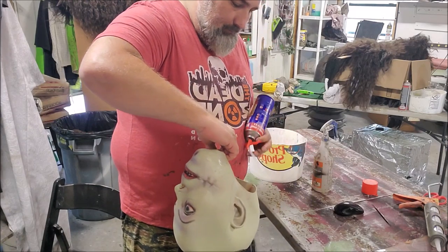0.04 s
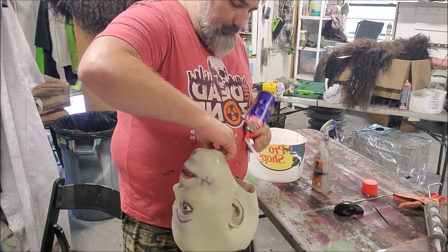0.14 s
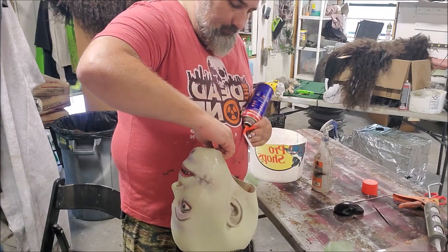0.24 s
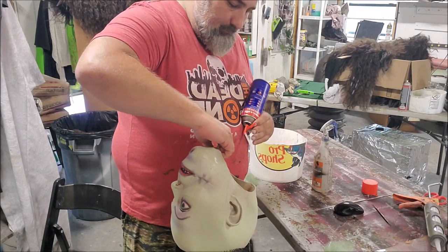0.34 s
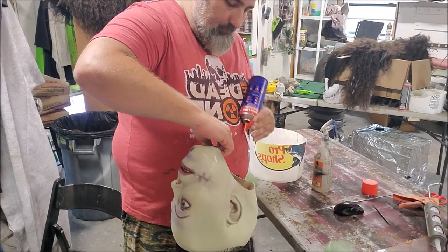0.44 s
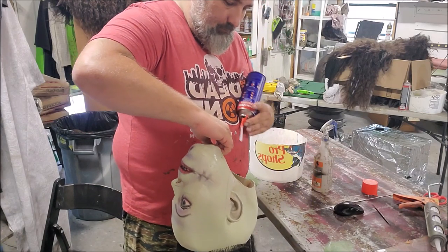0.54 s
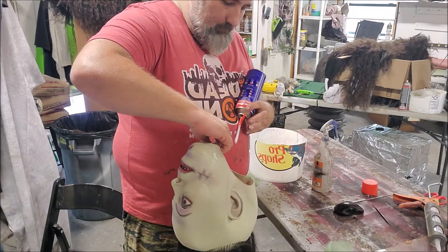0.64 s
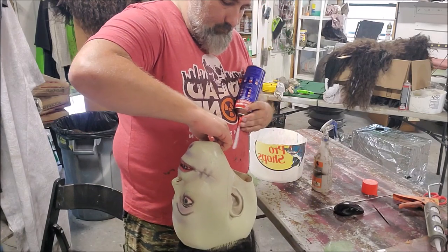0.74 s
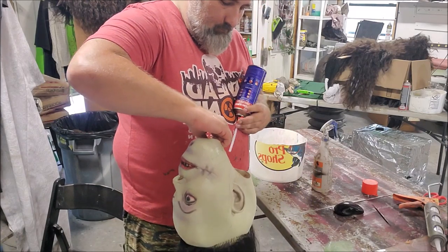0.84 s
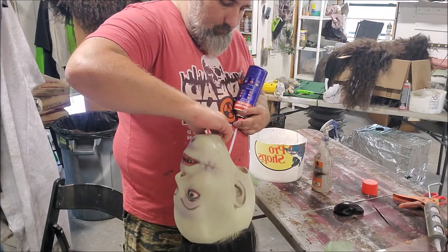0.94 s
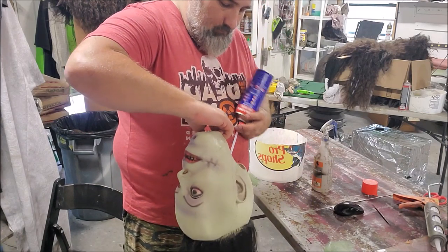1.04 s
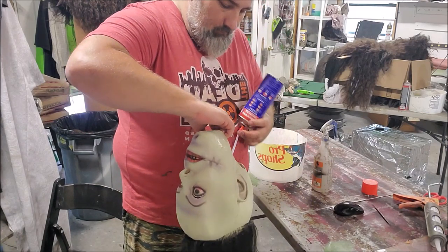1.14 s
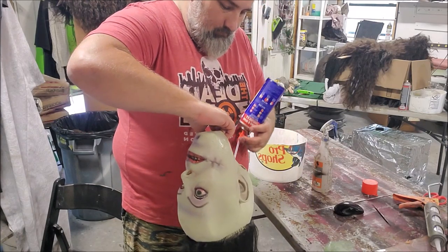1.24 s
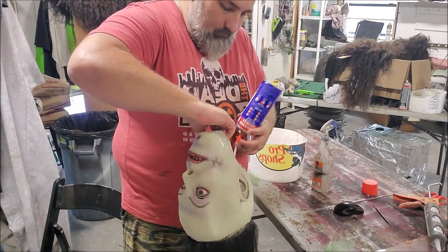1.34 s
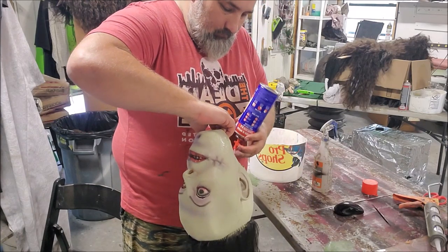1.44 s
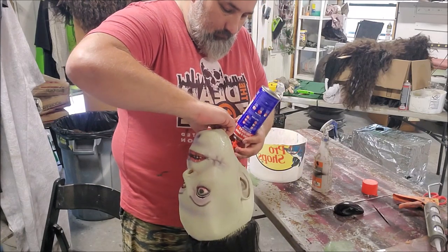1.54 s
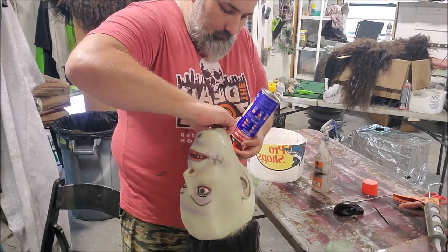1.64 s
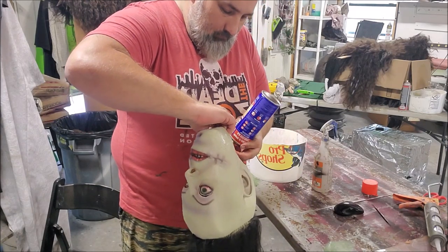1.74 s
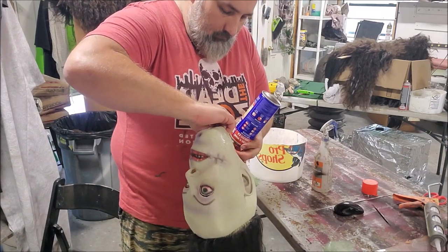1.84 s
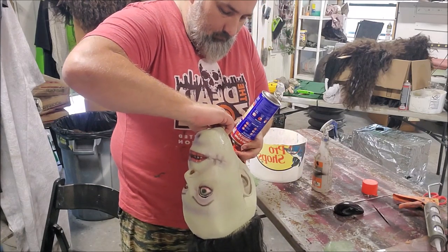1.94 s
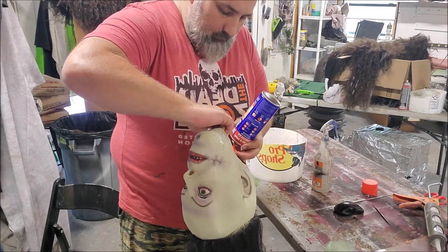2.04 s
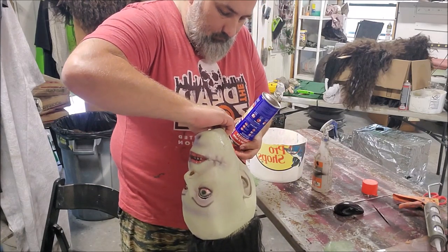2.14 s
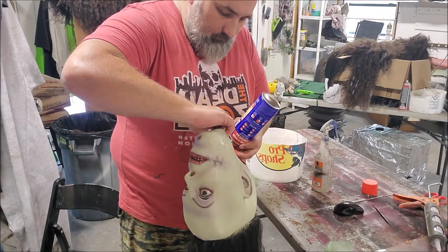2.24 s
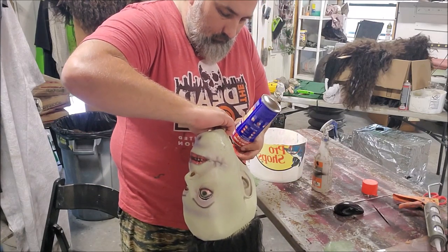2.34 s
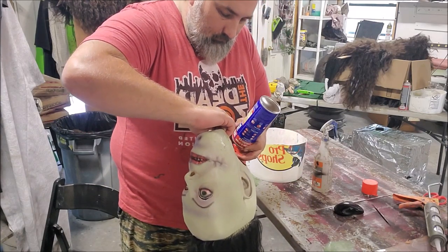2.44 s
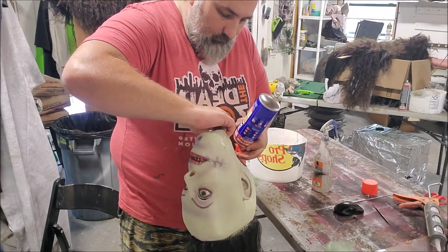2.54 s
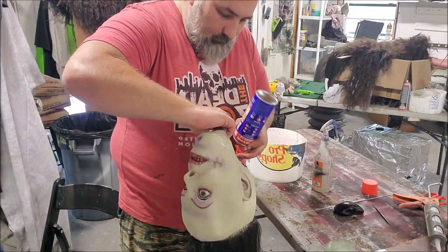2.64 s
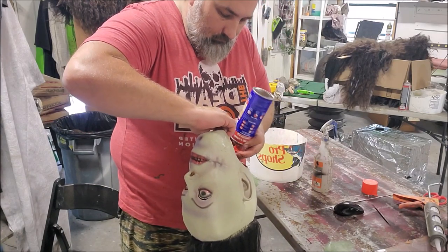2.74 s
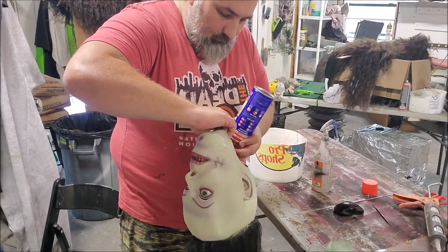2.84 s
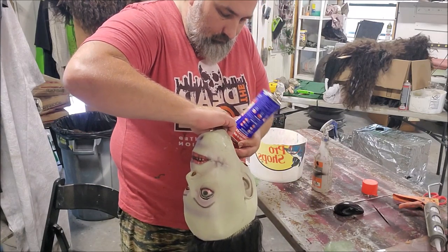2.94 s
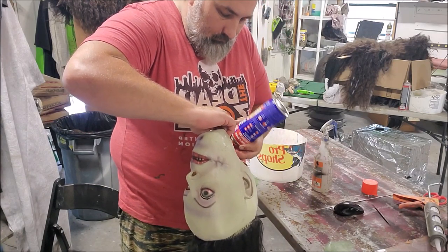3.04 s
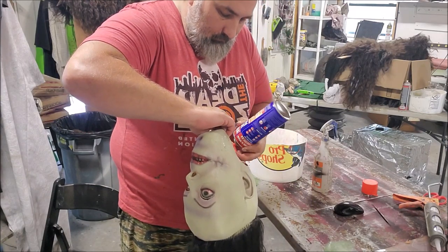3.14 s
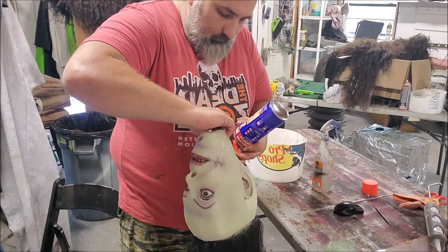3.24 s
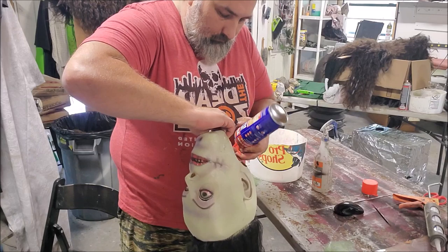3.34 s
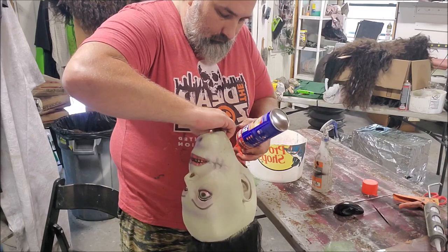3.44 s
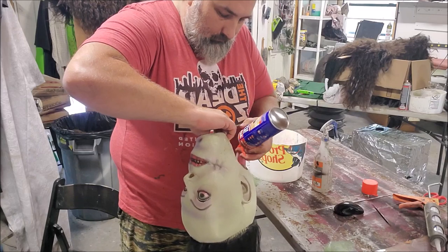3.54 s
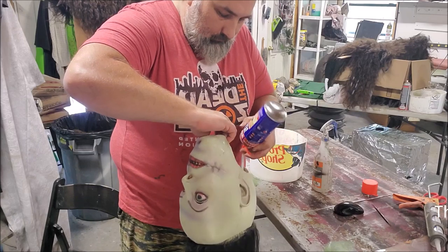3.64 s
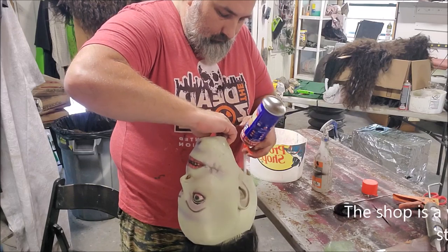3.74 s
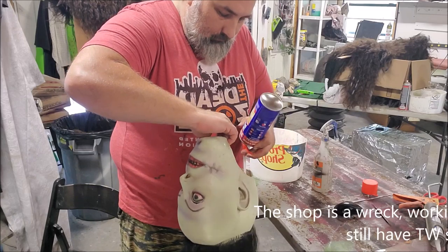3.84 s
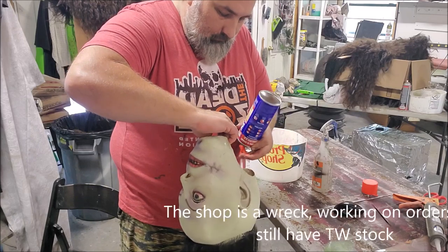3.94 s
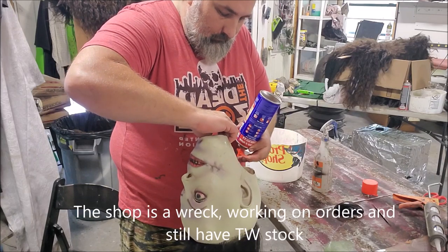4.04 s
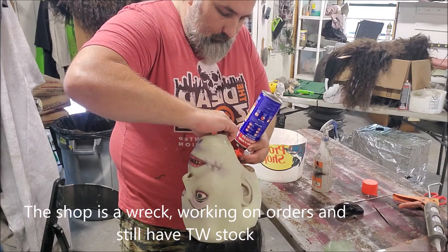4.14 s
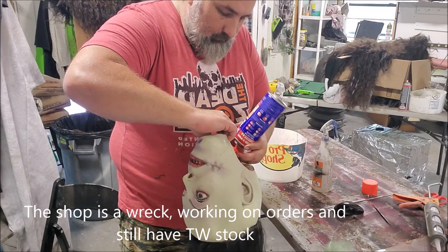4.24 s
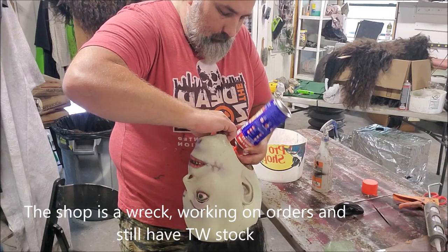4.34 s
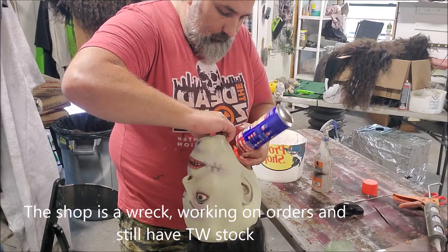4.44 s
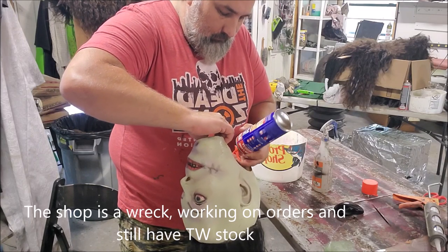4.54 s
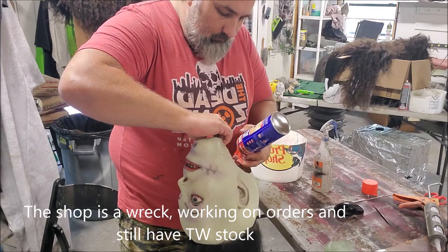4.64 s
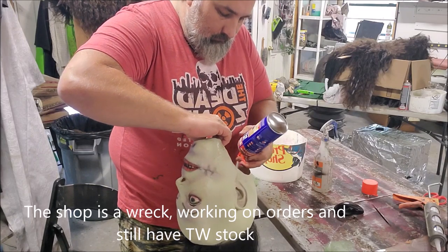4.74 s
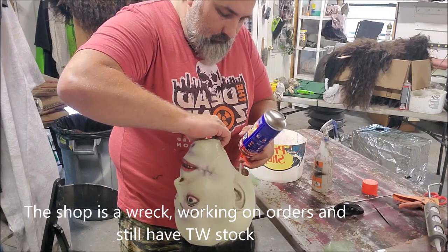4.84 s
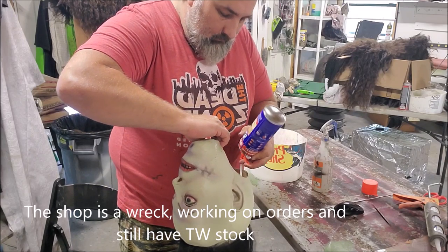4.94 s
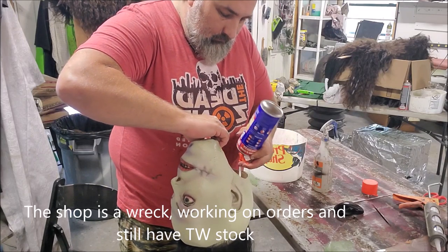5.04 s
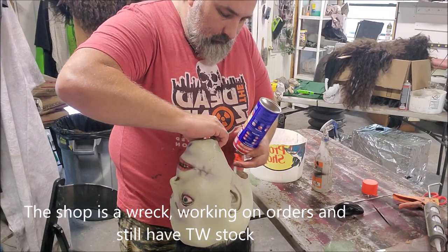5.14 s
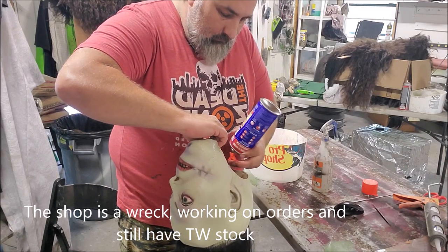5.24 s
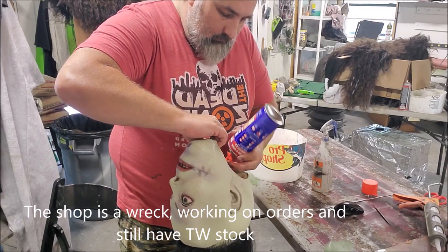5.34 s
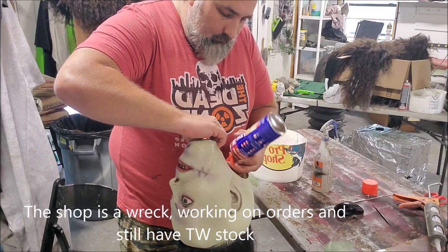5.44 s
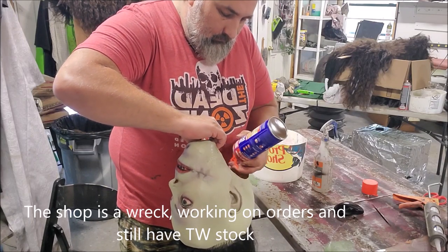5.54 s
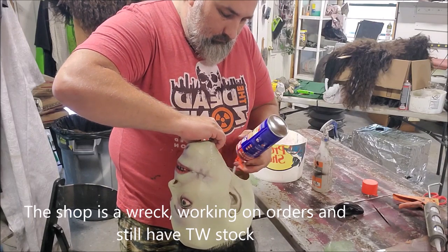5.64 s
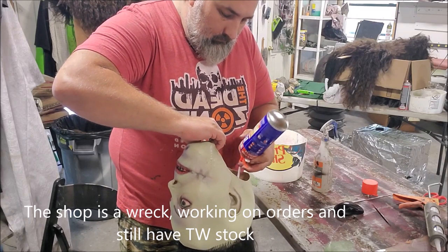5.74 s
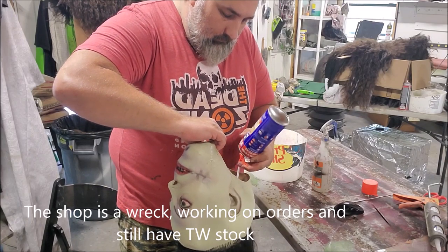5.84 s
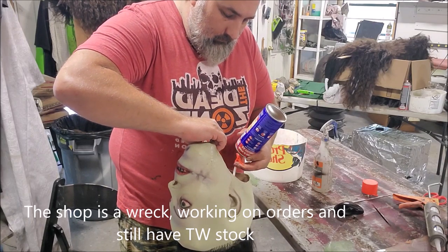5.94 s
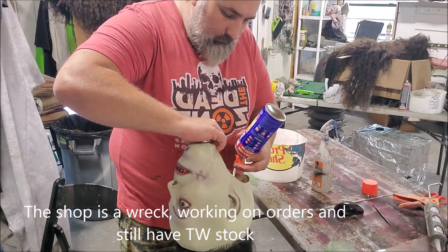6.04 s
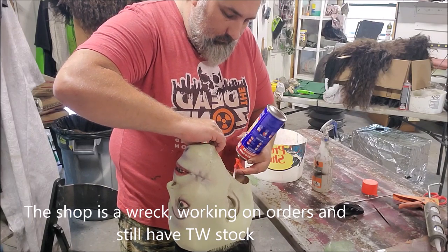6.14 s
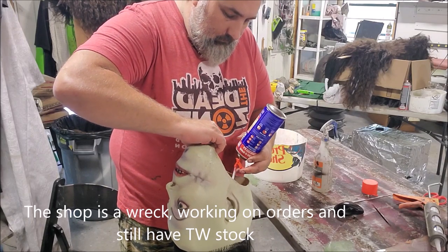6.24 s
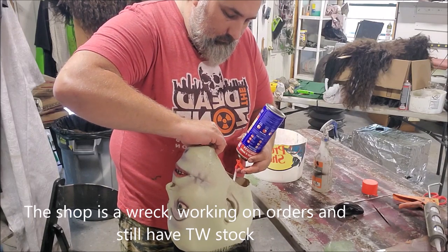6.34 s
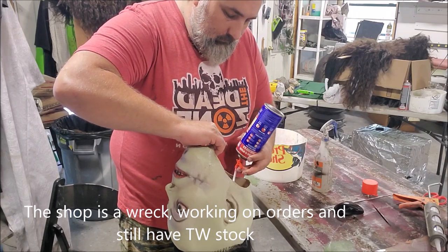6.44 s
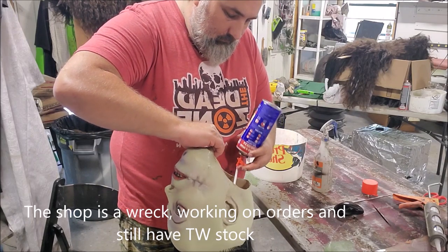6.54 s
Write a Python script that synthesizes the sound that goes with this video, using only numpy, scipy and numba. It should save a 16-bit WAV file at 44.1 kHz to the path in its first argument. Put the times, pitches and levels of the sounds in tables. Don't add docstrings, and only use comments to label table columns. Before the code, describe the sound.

Close stereo pickup at a workbench: nearly two seconds of low fan rumble and air, with a barely audible sleeve, small plastic ticks and a thin whistle of leaking gas. The can spits, catches and bursts into a bright, rushing spray. It gradually softens while its hollow coloration shifts as the straw moves inside the mask, then stops quickly with a brief room tail.

```python
import sys
import numpy as np
from scipy import signal
from scipy.fft import rfft, irfft, next_fast_len
from scipy.io import wavfile
from numba import njit

SR = 44100
rng = np.random.default_rng(int(sys.argv[2]) if len(sys.argv) > 2 else 0)


def gain_from_decibels(decibels):
    exponent = np.asarray(decibels, float) / 20
    return 10 ** exponent


def wrap_up_sound(samples):
    columns = np.atleast_2d(samples).T
    tamed = np.clip(columns, -1, 1)
    steps = np.round(tamed * 32767).astype(np.int16)
    wavfile.write(sys.argv[1], SR, steps)


N = 291060

# pitch_hz, level_db (per Hz)
FAN_COLOUR = [(12, -14.5), (20, -7), (48, -16.5), (63, -2), (81, 4.5), (103, -9.5), (131, -7.5), (162, -33),
              (200, -29), (260, -39), (440, -120)]
# middle_s, level_db, length_s
FAN_GUSTS = [
    (.6, -68.5, 1.5),
    (1.42, -65, 0.14),
    (1.93, -62, 0.27),
    (2.94, -68, 0.17),
    (4.4, -70, 1),
    (5.35, -69, 0.11),
    (5.81, -57, 0.1),
    (6.1, -56.5, 1),
]
# pitch_hz, level_db (per Hz)
AIR_COLOUR = [(70, -23), (120, -8.5), (270, 0), (450, -10), (860, -9), (1100, -14), (2250, -17.5),
              (2700, -29), (3500, -33.5), (6250, -30), (8500, -38.5), (12000, -34), (14300, -36.5),
              (16000, -23.5)]
# pitch_hz, likeness (-1 to 1)
AIR_LIKENESS = [(30, .8), (70, .95), (150, .87), (300, .8), (550, .4), (1650, -.2), (5000, 0)]
# middle_s, level_db, length_s
SLEEVE = [
    (.04, -73, 0.13),
    (.2, -74.5, .15),
    (.5, -83, 0.17),
    (.72, -80, 0.23),
    (1.23, -88, .06),
]
# start_s, level_db, t60_s
RUSTLES = [
    (1.166, -76, .5),
    (1.306, -66, .35),
]
# time_s, level_db
TAKE_UP = [
    (1.76, -90),
    (1.78, -72.5),
    (1.85, -68),
    (1.862, -61),
]
# pitch_hz, level_db (per Hz)
LEAK_COLOUR = [(1000, -23), (2000, 0), (3300, -4), (6000, -12), (8500, -12.5), (12000, -17), (14500, -14),
               (16000, -17)]
# time_s, level_db, pitch_hz
WHISTLE = [
    (1.12, -98, 2620),
    (1.25, -83, 3030),
    (1.4, -76, 3060),
    (1.7, -85, 3100),
    (1.77, -91.5, 3150),
    (1.8, -71.5, 3200),
    (1.862, -61, 3320),
]
# start_s, peak_db, pitch_hz, damping (0-1)
TICKS = [
    (0.5057, -58, 1280, 0.14),
    (1.1657, -74, 1290, 0.4),
    (1.3034, -57, 2110, 0.6),
    (1.3083, -49, 6080, 0.34),
    (1.315, -57, 2500, 0.15),
    (1.873, -27, 9100, .9),
]
# time_s, level_db
FLOW = [(1.864, -33), (1.875, -48), (1.943, -40.5), (1.98, -56.5), (2.002, -31.5), (2.032, -31), (2.1, -33),
        (2.47, -35), (2.94, -38.5), (3.24, -37), (3.5, -40), (4.06, -37), (4.19, -41.5), (4.7, -39),
        (5.09, -41), (5.6, -40), (6.21, -42), (6.228, -55)]
# pitch_hz, level_db (per Hz)
JET_COLOUR = [(300, -36), (520, -0.5), (1000, -13.5), (1500, 0), (2500, 3.5), (4000, 6.5), (4900, 4.5),
              (6000, 5), (7000, -6.5), (8000, -14), (10000, -55)]
# pitch_hz, level_db (per Hz)
EDGE_COLOUR = [(5000, -17.5), (7500, 2), (8500, 8), (10000, -3.5), (12000, 8), (14000, 1), (16000, -4.5)]
# middle_s, level_db, length_s
EDGE_PUFFS = [
    (1.882, -43, 0.022),
    (1.94, -40, 0.05),
    (2.0, -39.5, .035),
    (3.75, -62, 0.12),
    (4.8, -54, 0.046),
    (5.82, -52.5, 0.12),
]
# pitch_hz, width_hz, level_db
LOW_WAVES = [(780, 270, -55), (1250, 940, -46)]
MID_WAVES = [(1850, 380, -47.5), (2500, 1230, -38)]
TOP_WAVES = [(3200, 730, -40), (4000, 990, -41)]
# middle_s, pitch_hz, level_db, length_s
LOW_VISITS = [(1.91, 860, -36, 0.037), (2.487, 810, -40, 0.14), (2.655, 775, -39, 0.12),
              (3.024, 810, -38, .25), (3.487, 760, -36.5, 0.23), (3.843, 790, -39.5, 0.31),
              (4.346, 725, -37.5, 0.26), (4.717, 680, -37.5, 0.062), (4.9, 726, -42, 0.33),
              (5.327, 820, -52, 0.36), (5.737, 660, -44.5, 0.17), (1.933, 1290, -37.5, 0.11),
              (2.127, 1380, -46.5, 0.12), (2.66, 1250, -52, .2), (2.88, 1290, -39.5, 0.19),
              (3.127, 1200, -42, 0.13), (3.55, 1200, -36, 0.34), (3.848, 1110, -42.5, 0.23),
              (4.227, 1280, -47, 0.45), (4.87, 1200, -39.5, 0.27), (5.327, 1280, -45, 0.24),
              (5.73, 1160, -42.5, 0.2)]
MID_VISITS = [(1.931, 1770, -31.5, 0.072), (2.029, 1760, -28.5, 0.022), (2.17, 1790, -36, 0.23),
              (2.4, 1800, -37.5, 0.1), (3.301, 1970, -44.5, 0.15), (3.58, 1964, -31, 0.3),
              (3.82, 1666, -37.5, 0.28), (4.211, 1710, -39, .15), (4.58, 1750, -36, .15),
              (4.87, 1710, -34, 0.13), (5.551, 1950, -36, 0.079), (5.78, 1660, -35.5, 0.08),
              (2.01, 2570, -34.5, 0.033), (2.12, 2630, -33, 0.14), (2.53, 2410, -31.5, 0.31),
              (3.062, 2470, -39, 0.04), (3.27, 2790, -34, 0.4), (3.59, 2860, -29.5, 0.17),
              (3.79, 2500, -38.5, 0.24), (4.23, 2380, -31, 0.13), (4.57, 2460, -38, 0.32),
              (5.0, 2340, -42.5, .2), (5.56, 2540, -35.5, 0.15), (5.78, 2440, -40.5, 0.45),
              (6.149, 2670, -43.5, 0.42)]
TOP_VISITS = [(1.898, 3350, -44.5, 0.16), (2.08, 3280, -29.5, 0.11), (2.28, 3166, -27, 0.19),
              (2.6, 3280, -32.5, 0.38), (3.1, 3250, -38.5, 0.24), (3.501, 3290, -36.5, 0.22),
              (4.03, 3150, -27.5, 0.12), (4.23, 3200, -38.5, 0.19), (4.71, 3090, -30.5, 0.23),
              (5.25, 3230, -32, 0.23), (5.65, 2940, -32, 0.16), (5.9, 3430, -35.5, 0.2),
              (6.12, 3200, -34, 0.13), (2.03, 3970, -23, 0.044), (2.131, 3940, -31, 0.11),
              (2.63, 4160, -37, 0.26), (2.88, 3920, -35.5, 0.18), (3.101, 4050, -36, 0.13),
              (3.4, 3980, -39, 0.31), (3.82, 3970, -34.5, 0.16), (4.529, 3910, -31.5, 0.14),
              (4.781, 3810, -31, 0.055), (5.1, 4190, -40, 0.13), (5.479, 3610, -32, 0.16),
              (5.68, 4000, -38, 0.1)]
# pitch_hz, width_hz, level_db
BOTTLE_MODES = [(374.5, 24, -0.5), (449, 10, -17), (310, 28, -37)]
# middle_s, level_db, length_s
BOTTLE_GULPS = [
    (2.0, -36, 0.022),
    (2.08, -43, 0.039),
    (2.54, -44, 0.03),
    (3.41, -39, 0.069),
    (3.84, -44, 0.06),
    (4.91, -37, .12),
    (5.14, -38, 0.13),
    (5.43, -42, 0.064),
    (6.1, -56, 0.081),
]
# pitch_hz, depth (0-1)
HOLES = [(605, 0), (970, 0), (1430, 0.06)]
# middle_s, pitch_hz, added_depth (0-1), length_s
GRIPS = [(2.4, 636, .55, 0.95), (3.3, 644, .5, 1), (4.4, 632, .65, 0.76), (5.503, 614, .1, .3),
         (2.348, 986, .8, 0.65), (2.848, 895, .6, 0.66), (3.497, 983, .8, 0.41), (4.5, 950, .1, 0.67),
         (2.0, 1570, .8, 1), (2.5, 1430, .5, 0.44), (2.87, 1324, .8, .3), (3.506, 1380, .35, 0.87),
         (4.5, 1450, .3, 0.6)]
# middle_s, share_lost (0-1), length_s
HICCUP = [
    (1.922, .55, .012),
]
# pitch_hz, t60_s
SHOP_T60 = [(200, 0.5), (1000, 0.3), (2000, 0.13), (3200, 0.33), (5000, 0.16), (8000, 0.14), (15000, 0.31)]
# pitch_hz, level_db
SHOP_WET = [(200, 3.5), (700, 9), (1500, 8.5), (2800, 8.5), (5500, 10.5), (9000, 12), (14000, 16)]
# pitch_hz, likeness (-1 to 1)
SHOP_LIKENESS = [(200, .85), (500, .55), (1200, .05), (3000, 0)]
# pitch_hz, level_db
LEFT_PORT = [(150, 1.5), (700, 0.1), (1400, 1.5), (2800, 2), (5600, 3.5), (9500, -0.7), (13500, 7)]

STEADY_DB = -39
SPUTTER_S, SPUTTER_LENGTH_S = 1.915, 0.1
TIME_S = np.arange(N) / SR


def rms_one(x):
    return x / np.sqrt(np.mean(x ** 2) + 1e-20)


def in_time(rows):
    s, *columns = np.transpose(rows)
    return [np.interp(TIME_S, s, c) for c in columns]


def while_on(open_at_s, close_at_s, fade_s):
    opening = np.clip((TIME_S - open_at_s) / 0.0068, 0, 1) ** 2
    return opening * np.exp(-np.maximum(TIME_S - close_at_s, 0) / fade_s)


def while_spraying(fade_s):
    return while_on(FLOW[0][0], FLOW[-1][0], fade_s)


def at_hz(points, hz):
    table_hz, value = np.transpose(points)
    return np.interp(np.log(hz + 1), np.log(table_hz), value)


def coloured(x, points):
    n = x.shape[-1]
    size = next_fast_len(n)
    gain = gain_from_decibels(at_hz(points, np.fft.rfftfreq(size, 1 / SR)))
    return irfft(rfft(x, size) * gain, size)[..., :n]


def drift(rate_hz):
    r = np.exp(-80 * np.pi * rate_hz / SR)
    draws = rng.standard_normal(N // 40 + 2002)
    slow = signal.lfilter([1], [1, -2 * r, r * r], draws)[2000:]
    return np.interp(np.arange(N) / 40, np.arange(len(slow)), rms_one(slow))


def band(x, low_hz, high_hz):
    sos = signal.butter(2, [low_hz, min(high_hz, 0.45 * SR)], "band", fs=SR, output="sos")
    return signal.sosfilt(sos, x)


def resonance(x, hz, width_hz):
    r = np.exp(-np.pi * width_hz / SR)
    zeros = np.array([1, 0, -1]) * (1 - r * r) / 2
    return signal.lfilter(zeros, [1, -2 * r * np.cos(2 * np.pi * hz / SR), r * r], x)


@njit
def moving_resonance(x, hz, width_hz, rate):
    y = np.zeros(len(x))
    r = np.exp(-np.pi * width_hz / rate)
    for i in range(2, len(x)):
        drive = (1 - r * r) / 2 * (x[i] - x[i - 2])
        y[i] = drive + 2 * r * np.cos(2 * np.pi * hz[i] / rate) * y[i - 1] - r * r * y[i - 2]
    return y


def pair(likeness, size):
    mid, side = rfft(rng.standard_normal((2, size)))
    alike = np.clip(at_hz(likeness, np.fft.rfftfreq(size, 1 / SR)), -1, 1)
    return irfft(np.sqrt(1 + alike) * mid + np.sqrt(1 - alike) * side * [[1], [-1]], size)


def swells(s, size, length_s):
    t = np.arange(0, N + 64, 64) / SR
    humps = np.dot(size, 2. ** -((2 * (t - np.c_[s]) / np.c_[length_s]) ** 2))
    return np.interp(TIME_S, t, humps)


def gusts(rows):
    s, db, length_s = np.transpose(rows)
    return swells(s, gain_from_decibels(db), length_s)


def nearest(rows, centres_hz):
    rows = np.array(rows)
    home = np.abs(np.log(rows[:, 1:2] / centres_hz)).argmin(axis=1)
    dealt = [rows[home == k] for k in range(len(centres_hz))]
    return [(own.T, in_time(own[:, :2])[0]) for own in dealt]


def background():
    noise = pair(AIR_LIKENESS, N)
    unsteady = gain_from_decibels(0.8 * drift(2))
    fan = rms_one(coloured(noise, FAN_COLOUR)) * (gain_from_decibels(-60.5) + gusts(FAN_GUSTS))
    air = rms_one(coloured(noise[:, ::-1], AIR_COLOUR)) * gain_from_decibels(-62.5)
    return fan + air * unsteady


def leak():
    air = rng.standard_normal((4, N))
    rustle = sum((TIME_S >= s) * gain_from_decibels(db - 60 * np.abs(TIME_S - s) / t60) for s, db, t60 in RUSTLES)
    pressure = gain_from_decibels(in_time(TAKE_UP)[0])
    hiss = rms_one(coloured(air[0], LEAK_COLOUR)) * (rustle + gusts(SLEEVE) + pressure) * gain_from_decibels(1)
    seep = rms_one(band(air[1], 11500, 16000)) * gain_from_decibels(-1)
    seep = seep + rms_one(resonance(air[2], 420, 60)) * gain_from_decibels(12)
    whistle_db, hz = in_time(WHISTLE)
    whistle = moving_resonance(moving_resonance(air[3], hz, 200., SR), hz, 400., SR)
    whistle = rms_one(whistle) * gain_from_decibels(whistle_db + 2.6 * drift(9.7))
    return (hiss + seep * pressure + whistle) * while_on(-1, TAKE_UP[-1][0], fade_s=0.006)


def ticks():
    out = np.zeros(N)
    impulse = np.eye(1, 600)[0]
    for s, peak_db, hz, damping in TICKS:
        click = resonance(impulse, hz, np.clip(damping, 0.05, 1) * hz)
        click = click + 0.3 * damping ** 2 * impulse
        at = round(s * SR)
        out[at:at + 600] += click / np.abs(click).max() * gain_from_decibels(peak_db + 8)
    return out


def spitting_noise():
    return rng.standard_normal(N) * gain_from_decibels(0.8 * drift(28))


def sputter():
    return np.exp(-(2 * (TIME_S - SPUTTER_S) / SPUTTER_LENGTH_S) ** 4)


def jet(flow_db):
    hiss = rms_one(coloured(spitting_noise(), JET_COLOUR)) * gain_from_decibels(flow_db + 6.5 + 1.3 * drift(11))
    edge_db = -47.5 + 0.94 * (flow_db - STEADY_DB)
    sizzle = gain_from_decibels(edge_db + 1.3 * drift(19)) + gusts(EDGE_PUFFS)
    edge = rms_one(coloured(spitting_noise(), EDGE_COLOUR)) * sizzle
    return (hiss + edge) * while_spraying(fade_s=0.064)


def standing_waves(waves, visits, flow_db):
    out = 0
    visits_by_wave = nearest(visits, np.array(waves)[:, 0])
    for (_, width_hz, rest_db), ((s, _, db, length_s), hz) in zip(waves, visits_by_wave):
        drive = gain_from_decibels(rest_db + 0.2 * (flow_db - STEADY_DB)) + swells(s, gain_from_decibels(db), length_s)
        once = moving_resonance(spitting_noise(), hz, width_hz, SR)
        wave = moving_resonance(once, hz, width_hz, SR)
        crest = gain_from_decibels(-10.5) * rms_one(moving_resonance(wave, hz, width_hz / 3.3, SR))
        out = out + (rms_one(wave) + crest) * drive * gain_from_decibels(2 * drift(10.7))
    return out * while_spraying(fade_s=0.042)


def bottle():
    air = rng.standard_normal(N)
    ringing = 0
    for k, (hz, width_hz, db) in enumerate(BOTTLE_MODES):
        ringing = ringing + gain_from_decibels(db) * resonance(air, hz, width_hz) * (-1) ** k
    blown = gain_from_decibels(-37.5 - 0.5 * drift(4)) + gain_from_decibels(-24) * sputter() + gusts(BOTTLE_GULPS)
    return rms_one(band(ringing, 293, 780)) * blown * gain_from_decibels(-7.5) * while_spraying(fade_s=0.035)


def wall_roar():
    shaken = gain_from_decibels(-51.5 + 1.31 * (TIME_S - SPUTTER_S)) + gain_from_decibels(-44.5) * sputter()
    roar = rms_one(band(rng.standard_normal(N), 187, 429))
    return roar * shaken * gain_from_decibels(2.5) * while_spraying(fade_s=0.035)


def hollowed(x):
    grips_by_hole = nearest(GRIPS, np.array(HOLES)[:, 0])
    for (_, depth), ((s, _, added, length_s), hz) in zip(HOLES, grips_by_hole):
        lined_up = np.clip(depth + swells(s, added, length_s) + 0.09 * drift(4), 0, 1)
        for width_hz in (130., 65.):
            x = x - lined_up * moving_resonance(x, hz, width_hz, SR)
    return x


def shop(x, first_s):
    t = np.arange(int(0.7 * SR)) / SR
    edges_hz = 70 * 2. ** np.arange(0, 8.1, 0.5)
    echoes = pair(SHOP_LIKENESS, len(t)) * (1 - np.exp(-(t / first_s) ** 2))
    tail = 0
    for low, high in zip(edges_hz, edges_hz[1:]):
        hz = np.sqrt(low * high)
        dying = band(echoes, low, high) * gain_from_decibels(-60 * t / at_hz(SHOP_T60, hz))
        level = np.sqrt((high - low) / SR * 2 / np.sum(dying ** 2) * 2)
        tail = tail + dying * level * gain_from_decibels(at_hz(SHOP_WET, hz))
    return signal.fftconvolve(np.atleast_2d(x), tail, axes=1)[:, :N]


def swaying_shop(x):
    poses = 16
    pose = np.interp(TIME_S, [FLOW[0][0], FLOW[-1][0]], [0, poses - 1])
    out = np.zeros((2, N))
    for k in range(poses):
        first, last = np.flatnonzero(np.abs(pose - k) < 1)[[0, -1]]
        part = x[first:last] * np.cos(np.pi / 2 * (pose[first:last] - k))
        echoes = shop(part, first_s=0.00026)[:, :N - first]
        out[:, first:first + echoes.shape[1]] += echoes
    return out


def scene():
    flow_db, = in_time(FLOW)
    cavity = (standing_waves(LOW_WAVES, LOW_VISITS, flow_db)
              + standing_waves(MID_WAVES, MID_VISITS, flow_db)
              + standing_waves(TOP_WAVES, TOP_VISITS, flow_db))
    spray = hollowed(jet(flow_db) + cavity + bottle() + wall_roar())
    can = spray * (1 - swells(*np.transpose(HICCUP))) + leak() + ticks()
    left, right = (can + swaying_shop(can)) * gain_from_decibels(-5)
    tilt = np.array(LEFT_PORT)
    ports = np.array([coloured(left, tilt * [1, 0.5]), coloured(right, tilt * [1, -0.5])])
    return ports + background()


def band_limit(x):
    return signal.sosfilt(signal.butter(12, 16970, fs=SR, output="sos"), x)


def record(dry):
    top_cut = signal.cheby2(20, 60, 16030, fs=SR, output="sos")
    mix = signal.sosfilt(top_cut, dry)
    return band_limit(mix)


dry = scene()
out = record(dry)
wrap_up_sound(out)
```